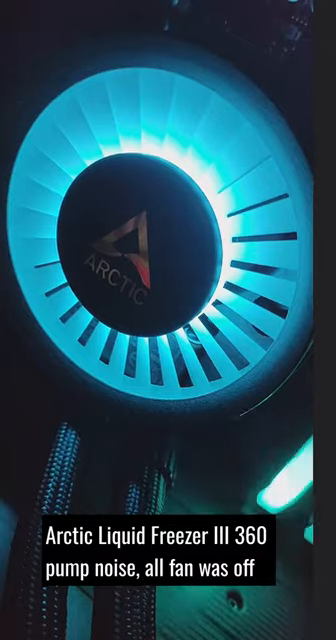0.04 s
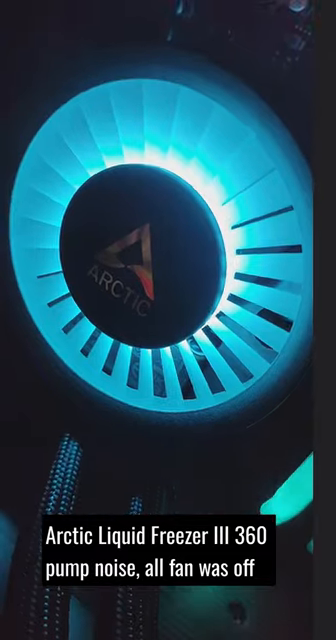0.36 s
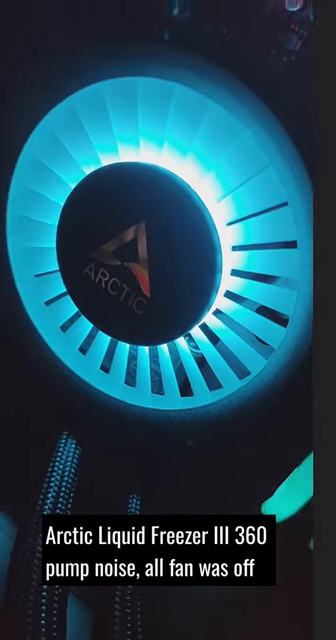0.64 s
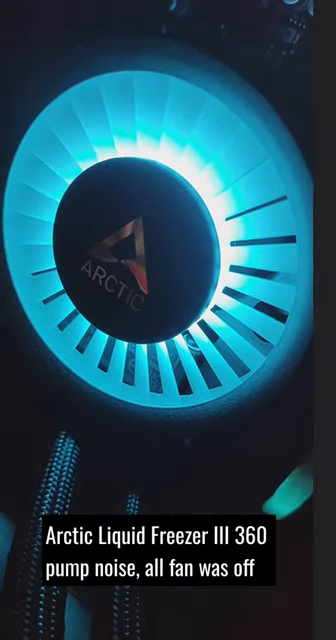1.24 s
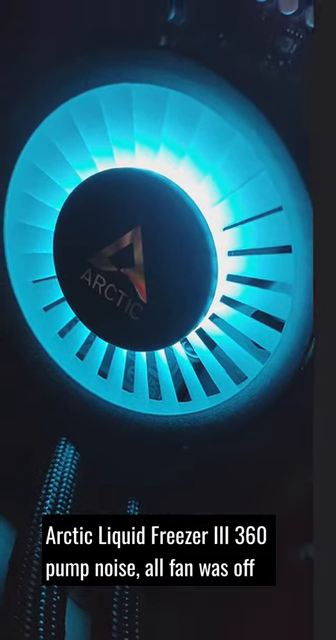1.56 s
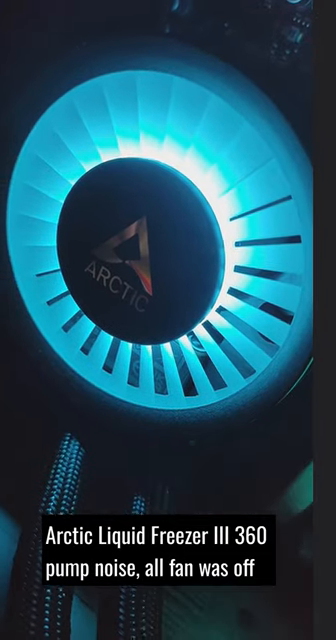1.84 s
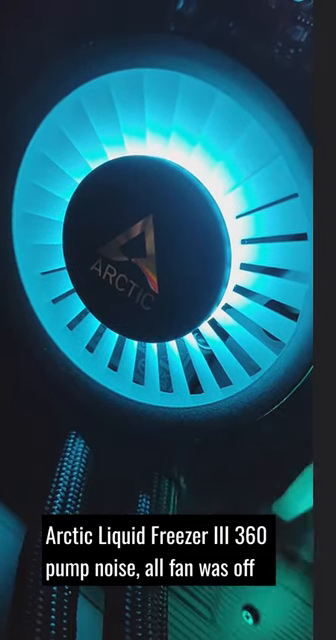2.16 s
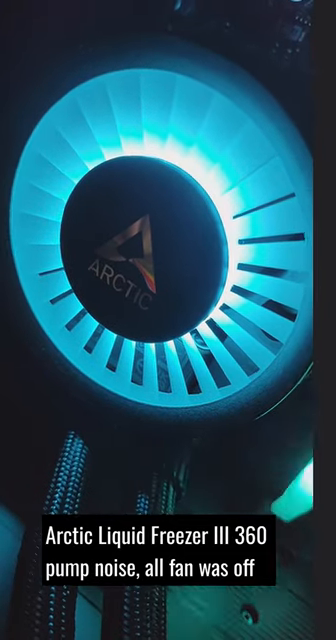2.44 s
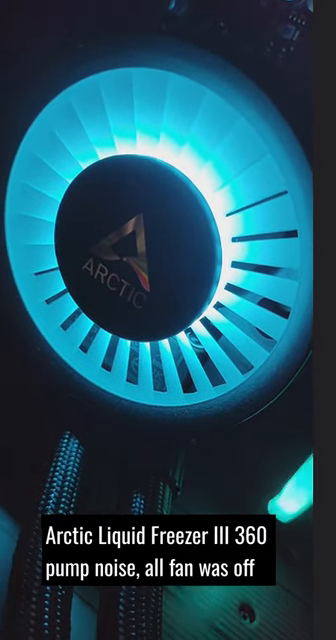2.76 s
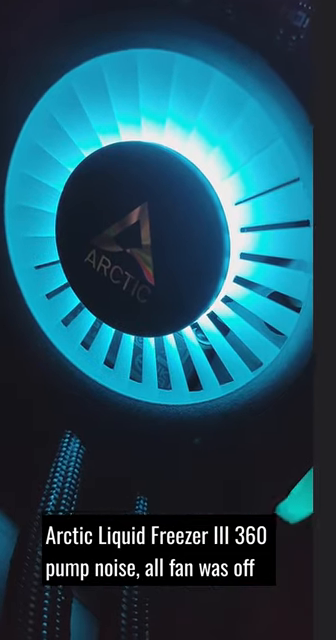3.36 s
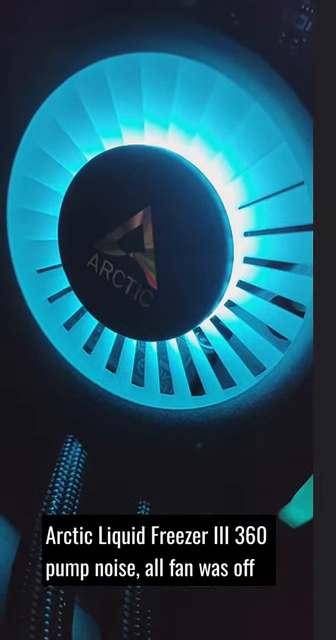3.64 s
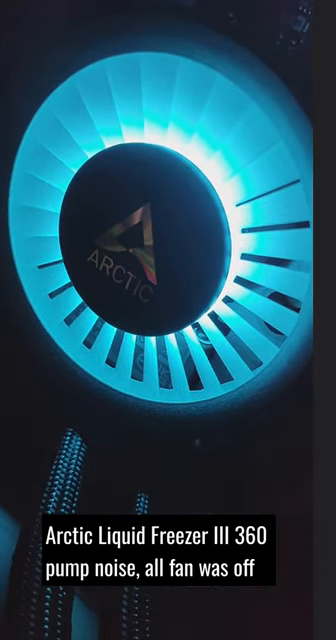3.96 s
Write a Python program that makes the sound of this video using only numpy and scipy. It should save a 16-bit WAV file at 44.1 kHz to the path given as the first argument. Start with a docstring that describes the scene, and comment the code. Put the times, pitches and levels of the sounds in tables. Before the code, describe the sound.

Steady low hum of a computer's cooling pump, with faint whine and rushing liquid.

```python
"""Inside a computer case, close to the cooler's steadily running water pump.
Two low tones near 90 Hz, probably two motors, beat slowly; the pump motor adds a fluttering whine.
Coolant rushes through the housing and fizzes in its resonances, while tiny air bubbles ping.
One faint, high squeak passes over a bed of microphone hiss."""
import sys
import numpy as np
from scipy.fft import rfft, irfft, next_fast_len
from scipy.io import wavfile
from scipy.ndimage import map_coordinates

SR = 44100
rng = np.random.default_rng(int(sys.argv[2]) if len(sys.argv) > 2 else 0)


def put_to_file(sound):
    """Save the sound as 16-bit audio at rate SR, in the file named by the first command-line argument."""
    columns = np.atleast_2d(sound).T  # one column per channel
    safe = np.clip(columns, -1, 1)
    whole_steps = np.round(safe * 32767)
    wavfile.write(sys.argv[1], SR, whole_steps.astype(np.int16))


N = 176400


def amp(db):
    """Decibels to gain."""
    return 10 ** (np.asarray(db) / 20)


def unit(x):
    """Scale to rms 1."""
    return x / np.sqrt(np.mean(x ** 2) + 1e-20)


def seconds():
    """The time of each sample."""
    return np.arange(N) / SR


def wobble(rate):
    """A smooth random curve of rms 1, rate knots a second."""
    return unit(map_coordinates(rng.standard_normal(int(N * rate / SR) + 4), [seconds() * rate]))


def filtered(x, response):
    """x times a complex response of frequency."""
    m = next_fast_len(N + SR // 2)
    return irfft(rfft(x, m) * response(np.fft.rfftfreq(m, 1 / SR)), m)[:N]


def noise(spectrum):
    """Noise of rms 1 coloured by (Hz, dB) points."""
    f, db = np.transpose(spectrum)
    white = rng.standard_normal(N)
    return unit(filtered(white, lambda hz: amp(np.interp(np.log(hz + 1), np.log(f), db))))


def tone(cycles):
    """A sine of rms 1 along a count of cycles."""
    return np.sqrt(2) * np.sin(2 * np.pi * cycles)


def hum(hum_hz=90.2, beat_hz=0.603, crest_s=1.008):
    """Two nearly equal low tones swell and partly cancel, among weak steady ones."""
    # steady tones of the case and electronics (frequency [Hz], level [dB])
    case_tones = [(72.5, -68), (145.3, -70.5), (181.5, -71.5), (7751, -103), (7918, -106), (8615, -106)]
    t = seconds()
    cycles = hum_hz * t + rng.random()
    stronger = amp(-51.5) * tone(cycles)
    weaker = amp(-54.5) * tone(cycles + beat_hz * (t - crest_s))
    steady = sum(amp(db) * tone(hz * t + rng.random()) for hz, db in case_tones)
    return stronger + weaker + steady


def pump_whine(cycles, flutter_per_s=36):
    """The motor's fundamental waxes and wanes; its overtones flutter in level and phase."""
    # envelope of the fundamental (time [s], level [dB])
    envelope = [(.26, -64), (.58, -61.5), (1.04, -63.5), (1.29, -75), (1.7, -71), (2.08, -62.5),
                (2.75, -66), (3.0, -72.5), (3.55, -72), (3.85, -70)]
    # motor overtones (multiple of the fundamental, level [dB], flutter depth [ratio])
    overtones = [(2, -69.5, 0.27), (3, -79, .5), (4, -93.5, .5), (5, -93.5, 0.56), (6, -84.5, 0.51),
                 (8, -101.5, 0.42)]
    whine = amp(np.interp(seconds(), *np.transpose(envelope))) * tone(cycles)
    for multiple, db, depth in overtones:
        flutter = 1 + depth * (wobble(flutter_per_s) + 1j * wobble(flutter_per_s)) / np.sqrt(2)
        partial = np.exp(2j * np.pi * (multiple * cycles + rng.random()))
        whine += amp(db) * unit(np.real(flutter * partial))
    return whine


def coolant_rush(level_db=-58, churn_db=0.46):
    """Coolant flows through the pump with a dark, lightly churning rush."""
    # colour of the flow (frequency [Hz], relative level [dB])
    flow_spectrum = [(20, -9), (45, -6), (75, -3), (120, 1), (220, -2.5), (300, -5.5), (370, -11),
                     (480, -12), (570, -10.5), (680, -17.5), (780, -20.5), (1150, -23.5), (1550, -29),
                     (3000, -34.5), (7000, -46)]
    return noise(flow_spectrum) * amp(level_db + churn_db * wobble(60))


def coolant_fizz(cycles, level_db=-76, churn_db=1, pulse_depth=0.4, pulse_top_hz=3500):
    """Fizzing coolant rings the housing; the lower resonances pulse with the motor."""
    # resonances of the pump housing (centre [Hz], width [Hz], relative gain [dB])
    resonances = [(1010, 50, 0), (1240, 130, -10), (2030, 240, 0), (2377, 120, 2), (3130, 300, -11),
                  (3700, 1000, -15.5), (5280, 200, -9), (5680, 260, -10), (6440, 350, -19)]

    def housing(hz):
        return sum(amp(db) * 1j * hz * width / (centre ** 2 - hz ** 2 + 1j * hz * width)
                   for centre, width, db in resonances)

    fizz = rng.standard_normal(N) * amp(churn_db * wobble(110))
    pulsing = fizz * pulse_depth * tone(cycles)
    low_pulsing = filtered(pulsing, lambda hz: 1 / (1 + (hz / pulse_top_hz) ** 10))
    return amp(level_db) * unit(filtered(fizz + low_pulsing, housing))


def bubbles(per_s=16, peak_db=-69, centre_hz=2380, scatter=0.06, t60_s=0.029):
    """Tiny air bubbles ping at random, close to the housing's main resonance."""
    pings = np.zeros(N + SR)
    t = np.arange(SR // 20) / SR
    decay = amp(peak_db - 60 * t / t60_s)
    for start in rng.integers(N, size=round(per_s * N / SR)):
        hz = centre_hz * (1 + scatter * rng.uniform(-1, 1))
        pings[start:start + len(t)] += decay * np.sin(2 * np.pi * hz * t)
    return pings[:N]


def squeak(crest_s=2.278, crest_hz=10360, sag_hz_per_s2=82000):
    """A thin whistle arches up and down in pitch, dropping out at its crest."""
    # audible bursts along the arch (centre time [s], half length [s], level [dB])
    bursts = [(2.19, .015, -89), (2.226, .014, -84), (2.334, 0.018, -79.5), (2.39, 0.039, -90)]
    t = seconds()
    hz = np.maximum(crest_hz - sag_hz_per_s2 * (t - crest_s) ** 2, 0)
    envelope = sum(amp(db) * np.exp(-((t - centre) / half) ** 2) for centre, half, db in bursts)
    return envelope * tone(np.cumsum(hz) / SR)


def microphone_hiss(level_db=-78):
    """A steady bed of hiss with a deep notch near 7 kHz."""
    # colour of the hiss (frequency [Hz], relative level [dB])
    hiss_spectrum = [(200, 11.5), (3000, 1), (4500, 7.5), (6600, 3), (7250, -20.5), (7800, 3), (10000, 2.5),
                     (14000, 5)]
    return amp(level_db) * noise(hiss_spectrum)


def scene(whine_hz=329.65, drift_hz=0.45):
    """One gently wandering motor speed drives whine and fizz; all layers mix to mono."""
    cycles = np.cumsum(whine_hz + drift_hz * wobble(3)) / SR
    motors = hum() + pump_whine(cycles)
    coolant = coolant_rush() + coolant_fizz(cycles) + bubbles()
    return (motors + coolant + squeak() + microphone_hiss())[None]


def record(dry):
    """The microphone opens abruptly, a little low, then settles; it cuts off the highest treble."""
    start_s, dip_db, settle_s, top_hz = 0.2477, -3, 0.069, 13930
    since = seconds() - start_s
    gain = (since >= 0) * amp(dip_db * np.exp(-np.abs(since) / settle_s))
    return filtered(dry[0] * gain, lambda hz: hz < top_hz)[None]


dry = scene()
out = record(dry)
put_to_file(out)
```